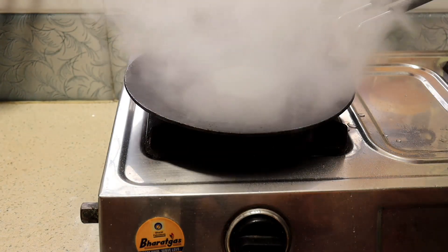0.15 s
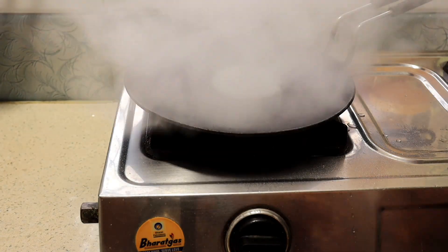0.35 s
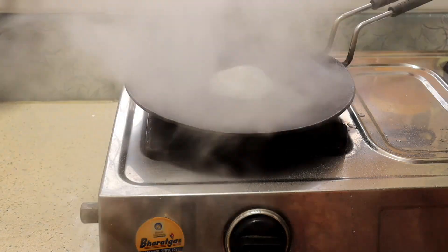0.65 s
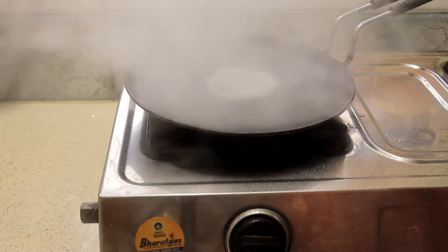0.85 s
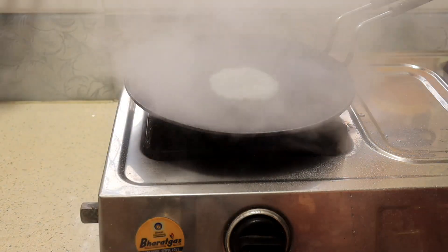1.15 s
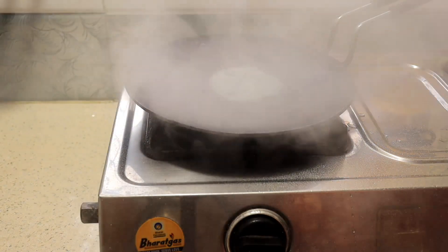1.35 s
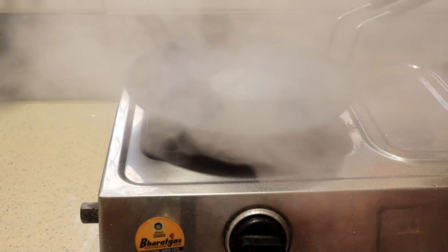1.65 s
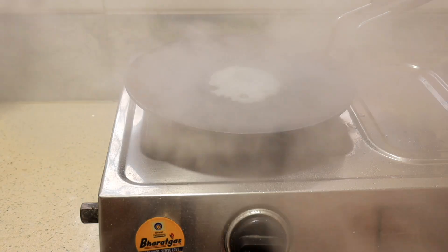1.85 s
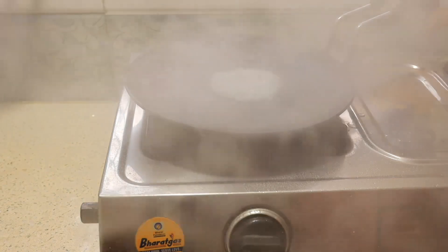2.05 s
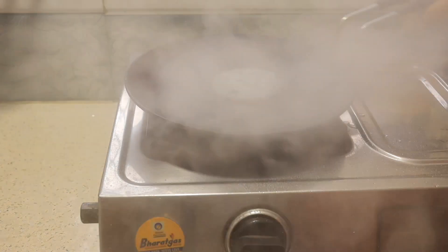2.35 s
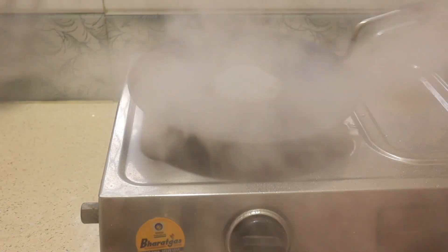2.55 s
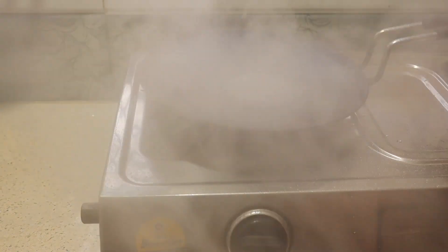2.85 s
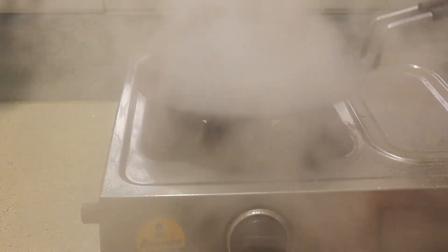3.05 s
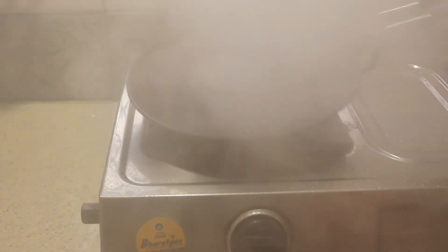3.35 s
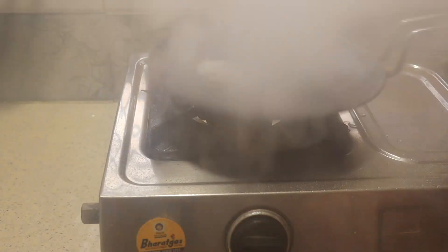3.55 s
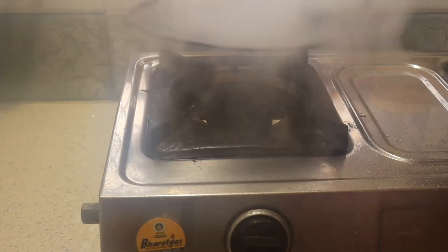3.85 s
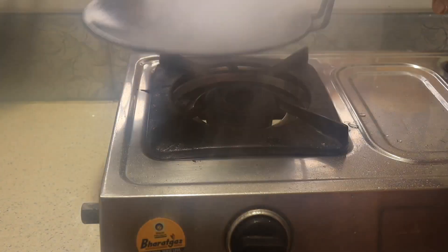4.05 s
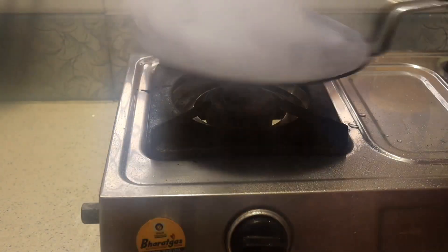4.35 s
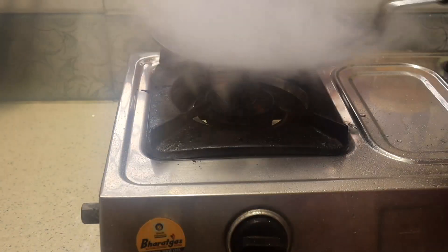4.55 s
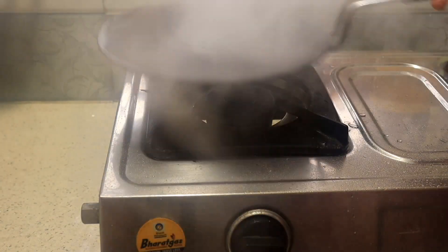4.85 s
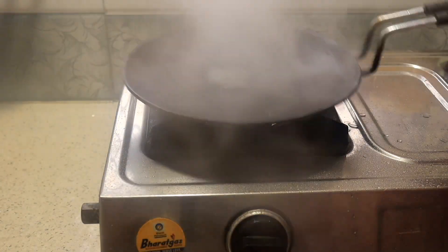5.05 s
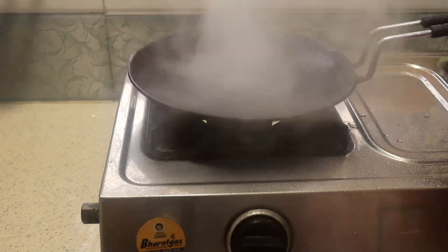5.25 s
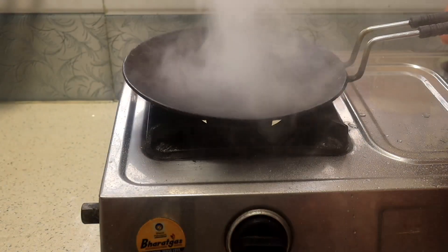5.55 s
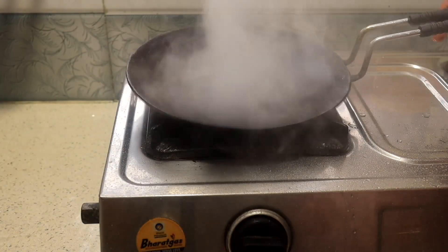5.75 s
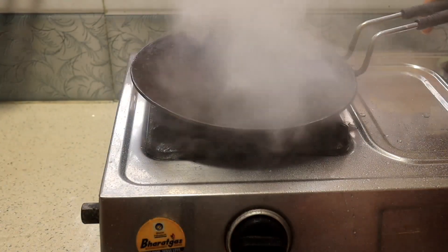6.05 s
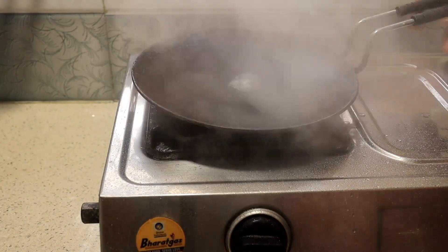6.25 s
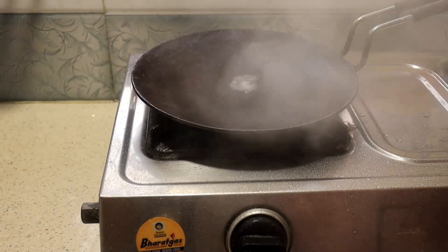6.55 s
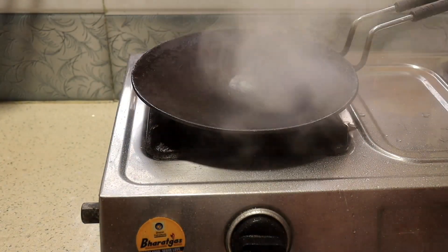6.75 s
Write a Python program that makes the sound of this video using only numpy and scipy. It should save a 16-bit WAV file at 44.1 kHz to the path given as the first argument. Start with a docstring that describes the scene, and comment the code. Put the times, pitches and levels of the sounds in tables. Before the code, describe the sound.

Loud frying-like hiss begins already in full flow, leaning slightly left, with crackles, tiny bubbling blips and dry snaps scattered across both sides. After a calmer, popping stretch, three swells of sizzling come as water runs onto fresh hot iron, the first crackling strongly on the right. The hiss then eases and dries. Close microphone, short hard kitchen reflections.

```python
"""Water boils off a very hot iron griddle in a small kitchen, close to a stereo microphone.
Countless tiny bubbles make a bright hiss, synthesized as shaped noise; larger steam pockets collapse or burst
under the puddle as sharp pops, each a cusp of pressure. Small pops crackle, bubbles ring and droplets tick.
The griddle is lifted and swirled midway: water runs onto fresh hot iron and the sizzle surges three times."""
import sys
import numpy as np
from scipy import signal
from scipy.fft import rfft, irfft, next_fast_len
from scipy.io import wavfile
from scipy.ndimage import uniform_filter1d

SR = 44100
rng = np.random.default_rng(int(sys.argv[2]) if len(sys.argv) > 2 else 0)


def wav_out(sig):
    """Save sig, one row per channel (or a flat mono array), as 16-bit PCM at SR to the path in sys.argv[1]."""
    wavfile.write(sys.argv[1], SR, np.round(np.clip(np.atleast_2d(sig).T, -1, 1) * 32767).astype(np.int16))


N = 304290


def gain_of(db):
    """Logarithmic level: 20 dB is a factor of ten in amplitude."""
    return 10 ** (np.asarray(db) / 20)


def evened(x):
    """Normalization to unit root mean square."""
    return x / np.sqrt(np.mean(x ** 2) + 1e-20)


def read_spectrum(points, hz):
    """Linear interpolation on a logarithmic frequency axis."""
    f, value = np.transpose(points)
    return np.interp(np.log(hz + 1), np.log(f), value)


def follow(rows, t):
    """Linear interpolation in time of every column of a table."""
    s, *columns = np.transpose(rows)
    return [np.interp(t, s, column) for column in columns]


def sides(pan_db):
    """Constant-power panning: left and right gains whose total power is fixed."""
    pair = np.array([gain_of(pan_db / 2), gain_of(-pan_db / 2)])
    return pair / np.sqrt(np.mean(pair ** 2, 0))


def add(mix, s, sound):
    """Superposition: a stereo sound is summed into the mix at time s."""
    part = mix[:, max(round(s * SR), 0):][:, :sound.shape[1]]
    part += sound[:, :part.shape[1]]


# swirls that run water onto fresh hot iron:
# [middle t/s, half width to 1/e t/s, swell of the hiss level/dB, relative boiling level/dB]
SWIRL_TABLE = [(3.56, 0.22, 3, -27), (4.36, 0.26, 5, -42), (5.14, 0.35, 4, -29.5)]


def swirling(t):
    """Gaussian displacement: how far each swirl has carried the water (0-1), one row per swirl."""
    return np.array([np.exp(-((t - middle) / width) ** 2) for middle, width, _, _ in SWIRL_TABLE])


# the resting puddle as it spreads and dries:
# [t/s, relative hiss level/dB, finest spray relative to the hiss level/dB, left over right level/dB]
PUDDLE_TABLE = [(0.0, -27.5, 1.5, -5), (0.5, -30.5, 1, -5), (1.35, -30.5, 0.8, -4), (1.6, -31, -1.5, -5),
                (2.15, -28, 1, -5.5), (2.52, -29, -2.5, -4.5), (2.75, -28, 1, -6.5), (3.25, -29, -2, -6.5),
                (3.85, -29.5, 1, -5.5), (4.05, -31, -1, -6.5), (4.4, -31, 0.5, -6.3),
                (4.78, -31.5, -0.8, -6), (5.15, -31.5, -1, -6), (5.8, -32.5, 0, -4.5),
                (6.4, -33.2, 0.5, -6), (6.75, -33, 1, -4), (6.9, -36, 1, -4)]


def sizzle_db(t):
    """Addition of levels: the resting puddle plus a swell for each swirl."""
    _, _, swell_db, _ = np.transpose(SWIRL_TABLE)
    return follow(PUDDLE_TABLE, t)[0] + swell_db @ swirling(t)


# colour of the hiss: [f/Hz, relative level per Hz/dB]
HISS_COLOUR = [(30, -58), (100, -53), (200, -25.5), (400, -14), (700, -11.5), (1020, -6.5), (1200, -3.5),
               (1450, -5), (2000, -3), (3000, 0.5), (7000, -0.17), (9800, -1), (13300, 3.5), (16000, -1)]
# lean of the hiss by band, on top of its moving position: [f/Hz, left over right level/dB]
HISS_LEAN = [(300, 7), (1200, 6.5), (2500, 3), (5000, 3), (9500, 1.5), (13000, -3), (16000, 0)]
# likeness of the hiss at the two ears: [f/Hz, coherence/1]
EAR_COHERENCE = [(100, 0.98), (500, 0.41), (1100, 0.5), (2200, 0.14), (6000, 0.12), (13000, 0.015)]
SWIRL_PAN_DB = 2  # a swirl runs the water toward the left


def hiss(level_db=6.5, patchy_db=0.83, flicker_db=0.1, flutter_db=0.53, spray_hz=10300, size=256):
    """Incoherent addition: tiny bubbles merge into patchy noise, with the finest spray in the top octave."""
    hop = size // 4
    frames, hz = N // hop + 5, np.fft.rfftfreq(size, 1 / SR)
    t = np.arange(frames) * hop / SR
    _, spray_db, rest_pan_db = (column[:, None] for column in follow(PUDDLE_TABLE, t))
    db = sizzle_db(t)[:, None]
    pan_db = rest_pan_db + SWIRL_PAN_DB * swirling(t).sum(0)[:, None]

    # level variations: patches in time and frequency, a quick flicker and a slower flutter of all bands
    a, b, c, d, patches = rng.standard_normal((5, frames, len(hz)))
    patches = uniform_filter1d(patches, size=8, axis=0)
    patches = evened(uniform_filter1d(patches, size=14, axis=1))
    flicker = evened(uniform_filter1d(rng.standard_normal(frames), size=5))[:, None]
    flutter = evened(uniform_filter1d(rng.standard_normal(frames), size=26))[:, None]

    # the right ear shares part of the left ear's noise
    same = np.clip(read_spectrum(EAR_COHERENCE, hz), -1, 1)
    left = a + 1j * b
    right = same * left + np.sqrt(1 - same ** 2) * (c + 1j * d)
    ears = np.array([left, right])

    def to_sound(z):
        """Overlap-add synthesis from short-time spectra."""
        return signal.istft(z.swapaxes(1, 2), nperseg=size, noverlap=size - hop)[1][:, :N]

    top = 1 / (1 + (spray_hz / (hz + 1)) ** 10)
    field_db = db + top * spray_db + patchy_db * patches + flicker_db * flicker + flutter_db * flutter
    placed = ears * gain_of(field_db) * sides(pan_db + read_spectrum(HISS_LEAN, hz))
    white = to_sound(placed) / to_sound(ears).std()

    length = next_fast_len(N)
    colour = evened(gain_of(read_spectrum(HISS_COLOUR, np.fft.rfftfreq(length, 1 / SR))))
    return gain_of(level_db) * irfft(rfft(white, length) * colour, length)[:, :N]


# bouts of boiling, when steam trapped under the puddle breaks out as crackle:
# [start t/s, length t/s, relative level/dB]
BOUT_TABLE = [(0.0, 0.17, -30), (0.198, 0.086, -27), (0.513, 0.21, -34.5), (0.853, 0.035, -27.5),
              (1.026, 0.45, -34), (1.24, 0.051, -35), (1.782, 0.18, -44), (2.09, 0.15, -39.5),
              (2.492, 0.033, -32), (2.62, 0.63, -46), (3.43, 0.29, -33), (4.166, 0.38, -38),
              (4.27, 0.18, -30), (4.636, 0.034, -33), (4.918, 0.7, -30.5), (5.2, 0.1, -29.5),
              (5.683, 0.087, -32.5), (5.94, 0.17, -34.5), (6.208, 0.037, -31), (6.34, 0.047, -36.5),
              (6.528, 0.3, -33)]
BOUT_RISE_S, BOUT_FALL_S = 0.021, 0.034  # time for a bout's power to change by a factor e
SIMMER_DB = -52  # relative level left between bouts
SWIRL_BOIL_POWER = 5.1  # boiling needs the thickest water, so it gathers at the middle of a swirl


def boiling_db(t):
    """Addition of powers: a simmer, the swirls, and bouts that rise, hold and fall exponentially."""
    _, _, _, swirl_db = np.transpose(SWIRL_TABLE)
    power = gain_of(SIMMER_DB) ** 2 + gain_of(swirl_db) ** 2 @ swirling(t) ** SWIRL_BOIL_POWER
    for start, length, db in BOUT_TABLE:
        early = np.maximum(start - t, 0)
        late = np.maximum(t - start - length, 0)
        power = power + gain_of(db) ** 2 * np.exp(-early / BOUT_RISE_S - late / BOUT_FALL_S)
    return 10 * np.log10(power)


def steam_pops(s, db, corner_hz, pan_db, swing_ratio=0.2, sag_hz=150, round_hz=7500,
               rebound=0.29, rebound_s=0.001143, shadow_hz=170, wrap=1.0, late_s=0.000058,
               across_s=0.0002, snap_db=-26, collapse_share=.68, size=1024):
    """Monopole pulse: a cusp of pressure swings back, downward if the pocket collapses, upward if it bursts."""
    hz, lead, count = np.fft.rfftfreq(size, 1 / SR), size // 8, len(s)

    def delayed(seconds):
        """Linear phase: a pure delay."""
        return np.exp(-2j * np.pi * hz * seconds)

    kind, again, wait, reach = rng.random((4, count, 1))
    corner_hz = corner_hz[:, None]
    sign = np.where(kind < collapse_share, -1, 1)
    cusp = sign / (1 + (hz / corner_hz) ** 2) / (1 + (hz / round_hz) ** 2)
    # the pocket springs back after a moment, which gives each pop its own colour
    cusp = cusp * (1 - 2 * rebound * again * delayed(rebound_s * (0.23 + 2 * wait ** 2)))
    # the water film tears: 16 samples of noise
    snap = gain_of(snap_db) * rfft(rng.standard_normal((count, 16)), size) / np.sqrt(16)

    swing_hz = swing_ratio * corner_hz  # a small, bright pocket also swings back faster
    swing = 1j * hz / (swing_hz + 1j * hz)
    swing = swing * 1j * hz / (sag_hz + 1j * hz)  # a small source radiates little bass

    # the far side is weaker and later; only bass wraps round to it
    bass = wrap * (.5 + reach) * delayed(late_s) / (1 + 1j * hz / shadow_hz)
    far = gain_of(np.minimum([pan_db, -pan_db], 0))[:, :, None]
    path = (far + (1 - far) * bass) * delayed(lead / SR + across_s * (1 - far))

    pulses = irfft((cusp + snap) * swing * path)
    # a level of 0 dB is the energy of unit rms held for one millisecond
    pulses /= np.sqrt((pulses ** 2).sum(2).mean(0) * 1000 / SR)[:, None]
    out = np.zeros((2, N))
    for k in range(count):
        add(out, s[k] - lead / SR, gain_of(db[k]) * pulses[:, k])
    return out


SMALL_POPS_PER_S = 340


def crackle(level_db=5.0, range_db=25, drying=3.4, wet_db=-29, corner_hz=2150, scatter=0.47, spread_db=14,
            sag_hz=260, wrap=1.0, snap_db=-18, order=8):
    """Stratified random process: small pops follow the boiling; each group holds many weak and one strong."""
    count = int(SMALL_POPS_PER_S * N / SR) // order * order
    when, jitter = rng.random((2, count))
    bright, place = rng.standard_normal((2, count))
    s = (np.arange(count) + order * (when - .5)) / SMALL_POPS_PER_S
    # a well wetted griddle boils evenly; as it dries, few pops stand out over dark gaps
    span_db = range_db + drying * (wet_db - sizzle_db(s))
    rank = (rng.random((count // order, order)).argsort().ravel() + jitter) / order
    # the mean power of the spread of sizes is taken out
    sizes_db = span_db[:, None] * np.linspace(0, 1, num=50) ** 2
    mean_db = 10 * np.log10(np.mean(gain_of(sizes_db) ** 2, 1))
    pop_db = boiling_db(s) + span_db * rank ** 2 - mean_db + level_db
    corners_hz = corner_hz * np.exp(scatter * bright)
    return steam_pops(s, pop_db, corners_hz, spread_db * place, sag_hz=sag_hz, wrap=wrap, snap_db=snap_db)


def ticks(pitches_hz, per_s, cycles, size_db, pan_db, spread_db, size=2048):
    """Damped oscillation: a shower of short rings of mixed pitch, size and place, at rms 1."""
    t, out = np.arange(size) / SR, np.zeros((2, N))
    for hz in pitches_hz:
        at = rng.integers(0, N, int(per_s * N / SR / len(pitches_hz)))
        sizes = gain_of(size_db * np.minimum(rng.exponential(1, len(at)), 3))
        clicks = np.zeros((2, N))
        clicks[:, at] = sizes * sides(pan_db + spread_db * rng.standard_normal(len(at)))
        flow = np.sin(2 * np.pi * hz * t) * t * np.exp(-2 * hz * t / cycles)
        ring = evened(np.diff(flow))  # pressure is the change of flow
        out += signal.oaconvolve(clicks, ring[None], axes=1)[:, :N]
    return evened(out)


BUBBLES_PER_S = 320


def bubbles(level_db=-7, low_hz=480, high_hz=3200, cycles=1.66, size_db=1.0, spread_db=9, count=16):
    """Bubble resonance: bubbles thrown up by the boiling ring briefly at one of several pitches."""
    boil_db = boiling_db(np.arange(N) / SR)
    pitches_hz = np.geomspace(low_hz, high_hz, count)
    return gain_of(level_db + boil_db) * ticks(pitches_hz, BUBBLES_PER_S, cycles, size_db, 0, spread_db)


SPITS_PER_S = 260


def spits(level_db=-38, size_db=3.5, low_hz=2000, high_hz=15000, cycles=1.2, pan_db=-3, spread_db=6, count=20):
    """Flash evaporation: droplets flung onto dry iron vanish in bright ticks."""
    pitches_hz = np.linspace(low_hz, high_hz, count)
    return gain_of(level_db) * ticks(pitches_hz, SPITS_PER_S, cycles, size_db, pan_db, spread_db)


# the loudest steam pops, before a common trim of level and brightness:
# [t/s, level over one ms/dB, corner of the pulse f/Hz, left over right level/dB]
LOUD_POP_TABLE = [(0.034, -15, 1600, -12), (0.064, -17, 3400, 11), (0.2385, -18, 1290, -7),
                  (0.3732, -17.5, 1700, -8), (0.4816, -18.5, 1800, -6), (0.5094, -12.5, 2000, -2),
                  (0.5332, -13.5, 1360, -5), (0.663, -18.5, 3400, 9), (0.7503, -14, 1800, -7),
                  (0.8109, -14, 5000, -8), (0.8268, -20.5, 2000, 2), (0.8469, -17, 2300, -8),
                  (0.902, -15, 5000, 3), (0.9869, -17, 3600, 10), (1.0069, -11, 1900, -12),
                  (1.0207, -13.5, 1590, 0), (1.1279, -14.5, 1900, -10), (1.178, -14.5, 1900, -4.5),
                  (1.299, -15, 1900, -8), (1.379, -20, 3100, -4), (1.44, -15, 2300, 9),
                  (1.486, -15, 2900, -7), (1.6962, -16, 1700, -3.5), (2.0107, -10.5, 1690, -10),
                  (2.0603, -16.5, 2100, 1), (2.084, -11.5, 1300, -8), (2.1169, -13.5, 1300, -7),
                  (2.1719, -17.5, 2500, -8), (2.2005, -15, 3500, -12), (2.4553, -16, 2400, 21),
                  (2.465, -9.5, 1600, -12), (2.501, -17.5, 2800, -7), (2.5757, -19, 2300, -6),
                  (2.811, -16, 1100, -10), (2.8324, -20, 1500, -12), (3.4006, -12.5, 1200, 24),
                  (3.431, -11, 1080, 7), (3.499, -11, 1500, 17), (3.519, -12.5, 800, 20),
                  (3.5287, -12.5, 1400, -19), (3.5364, -9, 1100, 21), (3.5775, -11, 1300, 16),
                  (3.63, -10.5, 1400, 26), (3.6819, -11, 5000, 23), (3.7075, -17.5, 1800, -8),
                  (4.0298, -20, 4000, 9), (4.1284, -17, 3700, 8), (4.2701, -10.5, 3000, 6),
                  (4.2837, -11, 2000, 7), (4.4635, -16, 2600, 3), (4.4753, -13.5, 1400, -19),
                  (4.5262, -10, 1300, -10), (4.701, -12.5, 2000, -7), (4.9248, -14, 3500, 18),
                  (4.9562, -14, 1600, 20), (4.9703, -15, 1900, -16), (5.0995, -14.5, 1400, -7),
                  (5.128, -10.5, 3100, 4), (5.159, -14, 2900, -6), (5.1682, -12.5, 1500, -7),
                  (5.2261, -11.5, 1600, -3), (5.365, -17, 1500, -7), (5.476, -14.5, 2100, 7),
                  (5.5097, -17, 1900, 22), (5.586, -16, 2400, -7), (5.6683, -16.5, 1500, -9),
                  (5.7182, -16, 2200, -5), (5.7467, -13, 1930, -8), (5.7715, -18, 2800, -7),
                  (5.921, -13.5, 1800, 4), (5.9298, -14, 5000, -19), (5.9651, -15, 1900, -6),
                  (6.0005, -16, 1700, -7), (6.0494, -14.5, 1510, -5.5), (6.0991, -20.5, 1200, 1),
                  (6.207, -17, 2200, -3), (6.285, -14.5, 1800, -2), (6.4353, -19.5, 3600, 8),
                  (6.494, -18, 3000, 5), (6.522, -20, 2500, -10), (6.5764, -14.5, 3700, -1.5),
                  (6.6757, -13.5, 1880, 1), (6.7571, -19, 1800, 4), (6.831, -18.5, 1800, -5)]


def loud_pops(level_db=-0.2, bright=1.045):
    """Impulsive radiation: the large steam pockets, scattered over the griddle."""
    s, db, corner_hz, pan_db = np.transpose(LOUD_POP_TABLE)
    return steam_pops(s, db + level_db, bright * corner_hz, pan_db)


# decay of the kitchen: [f/Hz, time to fall by 60 dB t/s]
KITCHEN_DECAY = [(150, 0.043), (1000, 0.28), (4000, 0.36), (14000, 0.093)]


def kitchen(x, first_s=0.004):
    """Diffuse reverberation: tiles and worktop return a short decaying tail, different on each side."""
    hz, t, z = signal.stft(rng.standard_normal((2, SR // 2)), SR, nperseg=256)
    decay_db = -60 * t / read_spectrum(KITCHEN_DECAY, hz)[:, None]
    tail = signal.istft(z * gain_of(decay_db), SR, nperseg=256)[1]
    tail *= np.arange(tail.shape[1]) > first_s * SR
    return signal.fftconvolve(x, tail / np.linalg.norm(tail[0]), axes=1)[:, :N]


def scene(room_db=-13):
    """Superposition: pops, crackle, bubbles and spits with their room, over the hiss."""
    near = loud_pops() + crackle() + bubbles() + spits()
    return near + gain_of(room_db) * kitchen(near) + hiss()


def record(dry, low_cut_hz=55, edge_hz=15900, order=6):
    """Filtering and saturation: the microphone's low cut, a soft ceiling on tall pops, and the band limit."""
    low_cut = signal.butter(1, low_cut_hz, "highpass", fs=SR, output="sos")
    thinned = signal.sosfilt(low_cut, dry)
    rounded = thinned / (1 + (thinned / .88) ** order) ** (1 / order)
    band_limit = signal.firwin(511, edge_hz, window=("kaiser", 9), fs=SR)
    return signal.oaconvolve(rounded, band_limit[None], "same", axes=1)


dry = scene()
out = record(dry)
wav_out(out)
```